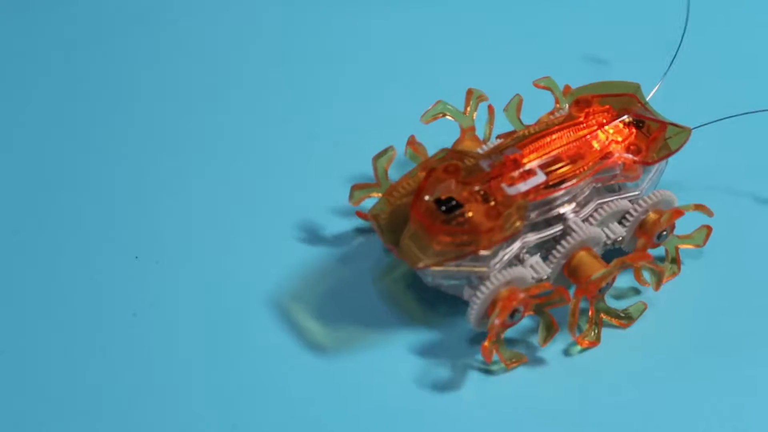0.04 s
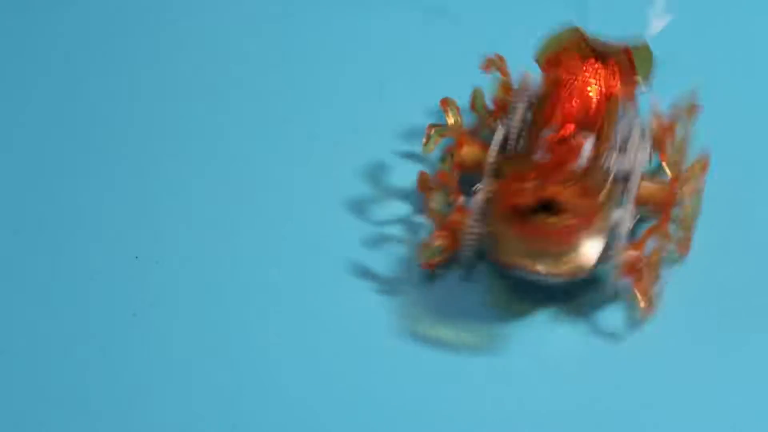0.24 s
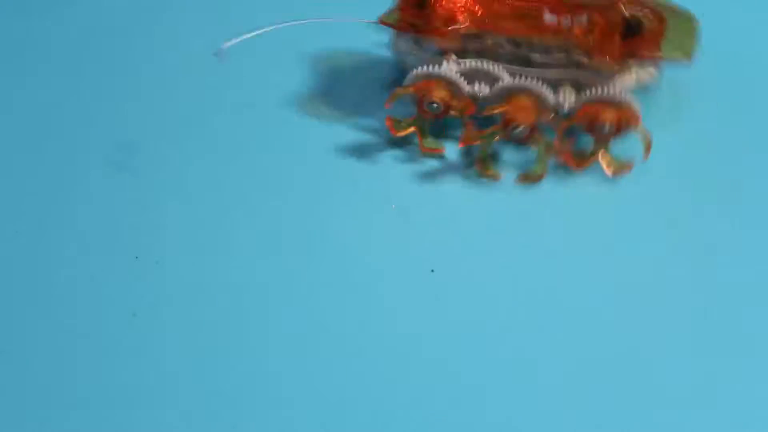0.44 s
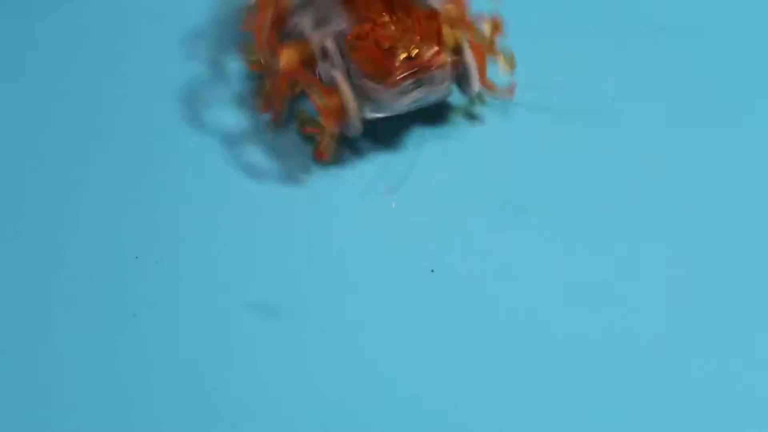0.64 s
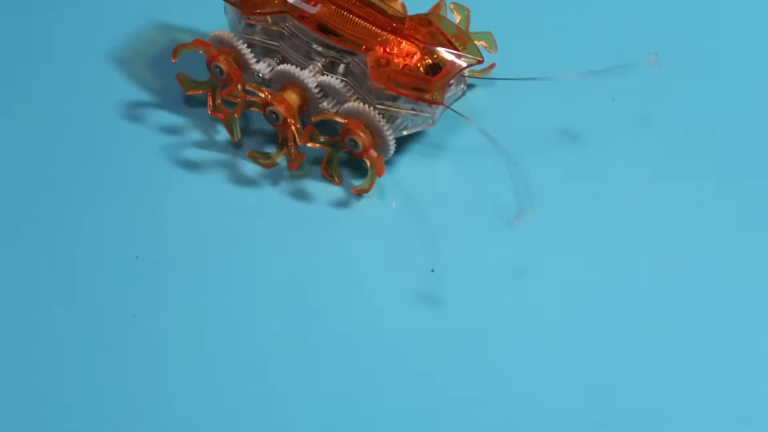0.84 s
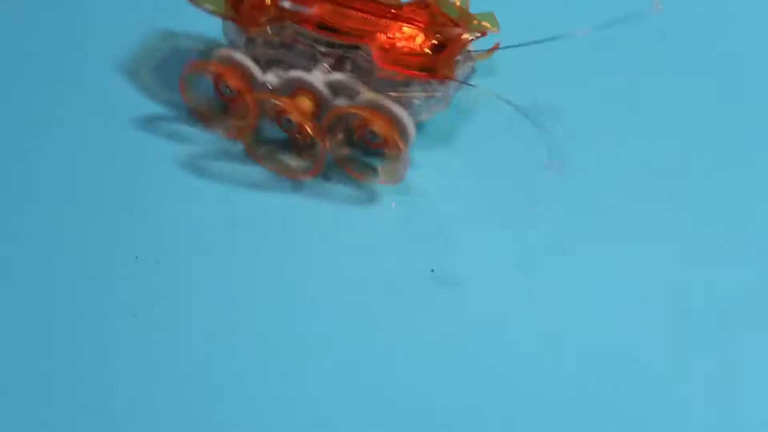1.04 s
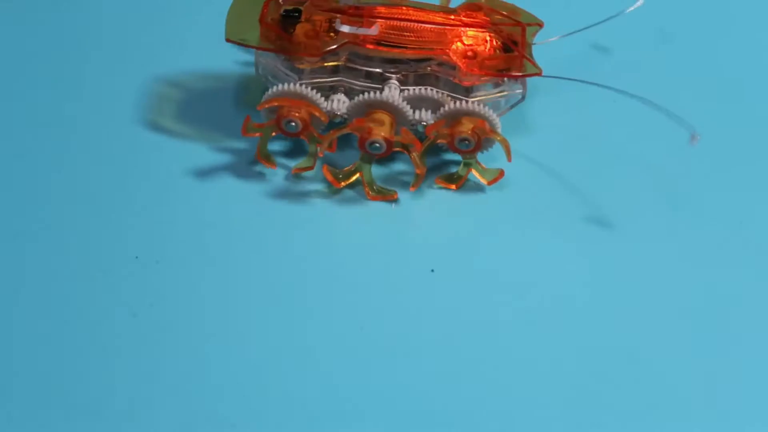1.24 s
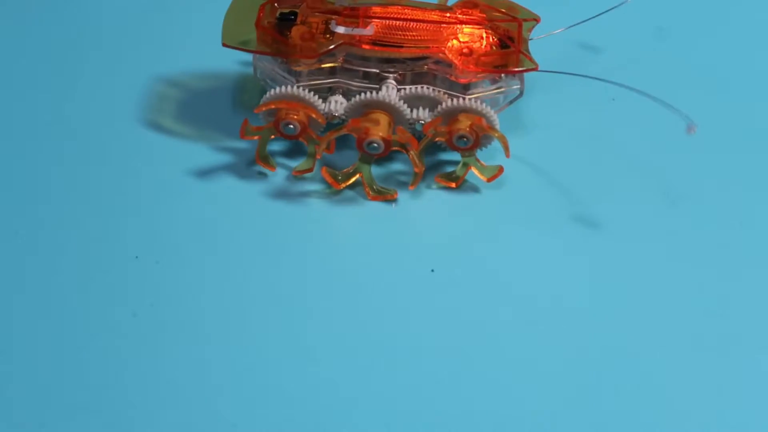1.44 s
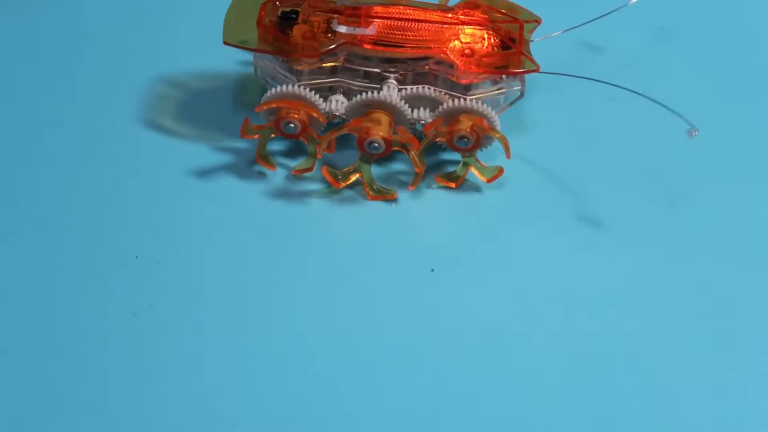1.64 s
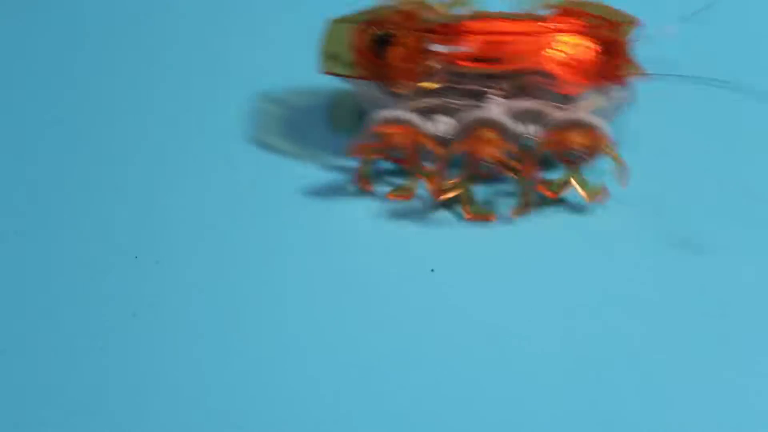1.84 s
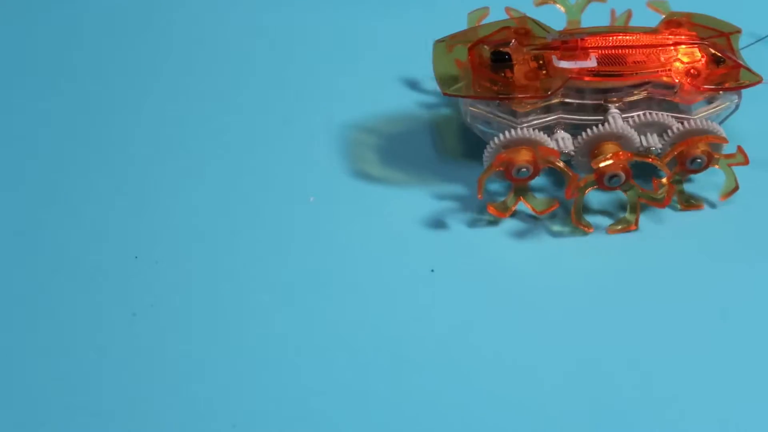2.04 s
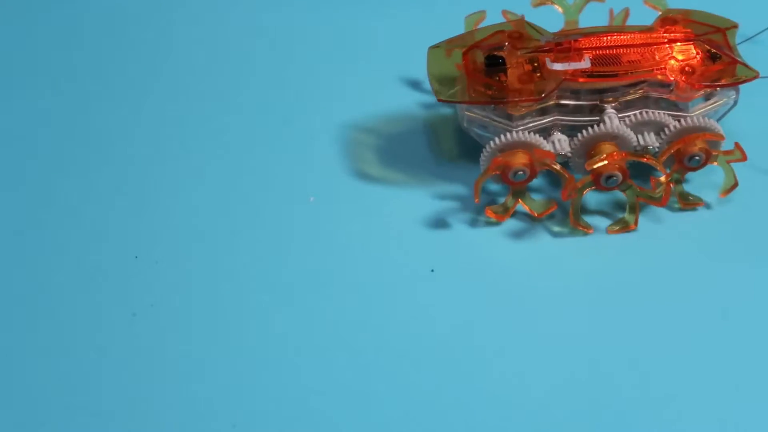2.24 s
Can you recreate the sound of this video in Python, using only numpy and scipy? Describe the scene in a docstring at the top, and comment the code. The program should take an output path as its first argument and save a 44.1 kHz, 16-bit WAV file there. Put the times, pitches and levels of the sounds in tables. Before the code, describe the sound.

A small toy robot scuttles across a table in three short, rattling bursts.

```python
"""A small plastic toy robot scuttles over a hollow table top in three short bursts.
Each foot slap thumps the table's modes and shakes the loose shell; the gears rattle while the
motor runs, and the legs tick as they come to rest. Before each burst a button on a hand-held
remote snaps and rings its case. A quiet room echoes both and hums behind them."""
import sys
import numpy as np
from scipy import signal
from scipy.fft import rfft, irfft
from scipy.io import wavfile

SR = 44100
rng = np.random.default_rng(int(sys.argv[2]) if len(sys.argv) > 2 else 0)


def master(y):
    """Save y as 16-bit WAV."""
    cut = np.clip(np.atleast_2d(y).T, -1, 1)
    pcm = np.round(cut * 32767)  # scale
    wavfile.write(sys.argv[1], SR, pcm.astype(np.int16))


N = 101429


def amp(db):
    """Decibels to gain."""
    return 10 ** (np.asarray(db) / 20)


def at_hz(points, hz):
    """Read a table on a log-frequency axis."""
    points_hz, values = np.transpose(points)
    return np.interp(np.log(hz), np.log(points_hz), values)


def impulses(start_s, gain):
    """Impulses at the given times and gains."""
    out = np.zeros(N + SR)
    np.add.at(out, (np.asarray(start_s) * SR).astype(int), gain)
    return out[:N]


def lag(x, tau_s):
    """One-pole smoothing."""
    r = np.exp(-1 / (tau_s * SR))
    return signal.lfilter([1 - r], [1, -r], x + 1e-18)


def ring(x, hz, t60_s):
    """One mode: a unit impulse starts a decaying sine of height 1."""
    r, w = amp(-60 / (t60_s * SR)), 2 * np.pi * hz / SR
    return signal.lfilter([0, np.sin(w)], [1, -2 * r * np.cos(w), r * r], x + 1e-18)


def flicker(tau_s, rms_db):
    """Randomly wandering gain."""
    drift = lag(lag(rng.standard_normal(N), tau_s), tau_s)
    return amp(rms_db * drift / np.sqrt(np.mean(drift ** 2) + 1e-20))


def stereo(mid, side):
    """Mid and side to left and right."""
    return np.array([mid + side, mid - side])


# Motor effort. Each row: time in seconds, gear rattle in dB, shuffle on the table in dB.
MOTOR_EFFORT = [(0, -53.5, -43), (.06, -62.5, -46), (0.184, -60, -47), (0.188, -30.5, -23.5),
                (.22, -29.5, -21), (.4, -28.5, -21.5), (.58, -30.5, -23), (.67, -28, -22.5),
                (0.769, -30, -26), (.82, -44, -36.5), (.93, -62.5, -44), (1.086, -65.5, -60),
                (1.091, -28, -31), (1.15, -23.5, -24.5), (1.2, -30.5, -26), (1.279, -41, -27.5),
                (1.34, -56.5, -45), (1.42, -64.5, -61), (1.757, -66, -54), (1.76, -30, -29.5),
                (1.819, -24.5, -21), (1.92, -26.5, -27), (1.96, -36.5, -20.5), (2.018, -35.5, -25),
                (2.08, -48.5, -39), (2.129, -58, -36.5), (2.18, -66, -58), (2.3, -67, -62)]


def motor():
    """The motor drives gears and shuffling feet: one gain curve for each."""
    time_s, gear_db, shuffle_db = np.transpose(MOTOR_EFFORT)
    return [amp(np.interp(np.arange(N) / SR, time_s, db)) for db in (gear_db, shuffle_db)]


# Foot slaps. Each row: start in seconds, shell rattle in dB, table thump in dB, table knock in dB.
FOOTFALLS = [(0.001, -46.5, -38, -31.5), (0.1971, -50, -46, -38), (0.216, -30.5, -51, -34.5),
             (0.2225, -25.5, -14, -17.5), (0.242, -24.5, -34, -34), (0.256, -24, -11.5, -13.5),
             (0.2668, -31, -27, -25), (0.2797, -24, -6, -35), (0.2931, -25, -14, -26.5),
             (0.303, -17.5, -16, -37), (0.311, -29, -22, -38), (0.3254, -43, -10.5, -44),
             (0.341, -39, -17, -29), (0.3468, -16.5, -4.5, -13.5), (0.365, -20, -24, -12.5),
             (0.3838, -20, -26, -17), (0.4062, -21, -26, -33), (0.419, -23, -10.5, -34),
             (0.431, -28, -43, -37), (0.441, -15.5, -17, -17.5), (0.452, -36, -46, -14.5),
             (0.4655, -20, -5.5, -49.5), (0.504, -17, -10, -7.5), (0.5153, -18, -33, -15.5),
             (0.5369, -16.5, -7.5, -8.5), (0.5648, -21.5, -29, -20), (0.5871, -18.5, -8.5, -17),
             (0.5969, -31, -45, -13), (0.6115, -38, -19, -36), (0.6204, -20, -16, -23),
             (0.6337, -23.5, -25, -13.5), (0.6623, -32, -33, -26), (0.6705, -19.5, -20, -33),
             (0.6789, -19.5, -14, -12.5), (0.6961, -27, -45, -25), (0.7048, -19, -30, -13),
             (0.716, -28, -24, -8.5), (0.734, -22, -13, -15.5), (0.7612, -23.5, -33, -20),
             (0.77, -25.5, -44, -13), (0.7942, -31.5, -32, -21), (0.849, -69, -62, -36),
             (0.8781, -61, -59, -41), (0.905, -71, -33, -38), (1.0912, -43, -49, -30),
             (1.1029, -44, -15.5, -50), (1.1152, -44, -39.5, -33), (1.131, -22.5, -19, -21),
             (1.1591, -17, -23, -43), (1.17, -23.5, -24, -37), (1.1842, -19.5, -11.5, -32),
             (1.2057, -26, -36, -25), (1.2204, -25, -41, -16), (1.2417, -24.5, -44.5, -21),
             (1.251, -55, -17.5, -19.5), (1.2635, -36, -31, -33), (1.2753, -31.5, -43, -31),
             (1.3003, -59, -40, -59), (1.3265, -48, -36, -51), (1.3442, -62, -31, -35),
             (1.373, -58, -39, -48), (1.769, -41, -49, -36), (1.7882, -15, -7, -17.5),
             (1.8132, -16, -26.5, -18.5), (1.8318, -29, -24, -41), (1.843, -44, -34, -34),
             (1.853, -39, -13, -52), (1.8608, -19, -15.5, -46), (1.8826, -18.5, -10, -26),
             (1.9085, -18.5, -17, -25), (1.9278, -16.5, -10, -15.5), (1.9465, -25, -10, -50),
             (1.963, -25, -13.5, -34), (1.9843, -30.5, -9.5, -26), (1.989, -50, -49.5, -37),
             (2.0002, -30, -46, -22), (2.0106, -30.5, -42, -30), (2.044, -42, -41, -24.5),
             (2.0552, -36, -51, -34), (2.1047, -56, -24.5, -36), (2.113, -56, -35, -48)]
# Table top, low and upper modes. Each row: frequency in Hz, level in dB, T60 in seconds.
THUMP_MODES = [(110.7, -3.5, 0.15), (139.2, -7, 0.061), (168, -14, 0.13), (213.4, -14.5, 0.089)]
KNOCK_MODES = [(286, -29, 0.01), (356, -9, 0.07), (416, -17, 0.13), (457, -7.5, 0.075), (548, -17, 0.067),
               (650, -16, 0.061), (796, -8, 0.03), (939, -15.5, 0.051), (1089, -11.5, 0.05),
               (1234, -8.5, 0.023), (1815, -12, 0.018)]
THUMP_DELAY_S, THUMP_SCATTER_DB = 0.00332, 2
KNOCK_DELAY_S, KNOCK_SCATTER_DB, KNOCK_SHUFFLE_DB = 0.00145, 4.5, 1
SHUFFLES_PER_S, CONTACT_S, TABLE_HIGHPASS_HZ = 300, 0.00034, 101


def table_top(shuffle_gain):
    """Each foot pushes the top down, striking every mode unevenly; small shuffles fill in between."""
    start_s, _, thump_db, knock_db = np.transpose(FOOTFALLS)
    shuffling = rng.random(N) < SHUFFLES_PER_S / SR
    groups = ((THUMP_MODES, THUMP_DELAY_S, thump_db, THUMP_SCATTER_DB, 0),
              (KNOCK_MODES, KNOCK_DELAY_S, knock_db, KNOCK_SCATTER_DB, KNOCK_SHUFFLE_DB))
    slaps = rumble = steady_rumble = 0
    for modes, delay_s, foot_db, spread_db, shuffle_db in groups:
        scatter_db = spread_db * rng.standard_normal((len(start_s), len(modes)))
        for k, (hz, mode_db, t60_s) in enumerate(modes):
            pushes = impulses(start_s + delay_s, -amp(foot_db + mode_db + scatter_db[:, k]))
            slaps += ring(pushes, hz, t60_s)
            shuffles = amp(mode_db + shuffle_db) * shuffling * rng.standard_normal(N)
            rumble += ring(shuffles * shuffle_gain, hz, t60_s)
            steady_rumble += ring(shuffles, hz, t60_s)
    top = lag(slaps + rumble / np.std(steady_rumble), CONTACT_S)
    return signal.sosfilt(signal.butter(4, TABLE_HIGHPASS_HZ, "high", fs=SR, output="sos"), top)


# Shell spectrum. Each row: frequency in Hz, relative density in dB.
SHELL_SPECTRUM = [(410, -32), (700, -3.5), (777, 8), (875, -16.5), (1250, -3.5), (1360, -12.5),
                  (1970, -2.5), (2190, -12), (3160, -3.5), (3640, -3), (4210, -15.5), (4730, -4.5),
                  (8420, -17.5), (12800, -16.5), (16000, -58)]
# Shell width. Each row: frequency in Hz, side over mid in dB.
SHELL_WIDTH = [(700, -65), (1300, -30), (2500, -80), (5000, -12.5), (9000, -11), (15000, -2.5)]
# Gear colour against the shaken parts. Each row: frequency in Hz, gain in dB.
GEAR_COLOUR = [(800, -12.5), (2000, -0.5), (3400, 1), (6000, 0.5), (9000, -0.5), (15000, -4)]
# Gear rasp brightening and dulling. Each row: time in seconds, gain above RASP_HZ in dB.
GEAR_RASP = [(.2, -0.5), (.5, 3), (.62, 0), (.68, 5), (.75, -1), (1.1, -1.5), (1.3, -2), (1.78, 0),
             (1.86, 2), (1.93, 3.5), (2.0, -7), (2.3, 2)]
RASP_HZ, RATTLE_RISE_S, RATTLE_FALL_S = 4300, 0.0013, 0.003
TICKS_PER_S, TICK_SPREAD_DB, TICK_GROUPS, SHELL_T60_CYCLES = 18000, 2.0, 9, 27.6


def shell(gear_gain):
    """Dense ticks of gears and loose parts ring short plastic modes; each footfall shakes out a burst."""
    start_s, rattle_db = np.transpose(FOOTFALLS)[:2]
    shake = lag(lag(impulses(start_s, amp(rattle_db)), RATTLE_RISE_S), RATTLE_FALL_S)
    shake *= amp(rattle_db.max()) / shake.max()
    gears = gear_gain * flicker(tau_s=0.0013, rms_db=1.5)
    rasp = amp(np.interp(np.arange(N) / SR, *np.transpose(GEAR_RASP)))
    ticking = rng.random(N) < TICKS_PER_S / SR
    strength = amp(TICK_SPREAD_DB * rng.exponential(1, N))
    ticks = ticking * strength * rng.choice([-1, 1], (2, N))
    group = rng.integers(0, TICK_GROUPS, N)   # each tick rings only its group of modes
    out = power = 0
    for k, hz in enumerate(np.geomspace(750, 15000, 36)):
        t60_s, density = SHELL_T60_CYCLES / hz, amp(at_hz(SHELL_SPECTRUM, hz))
        mode_ticks = ticks * (group == k % TICK_GROUPS) * flicker(tau_s=0.0087, rms_db=3)
        gain = density * np.sqrt(hz) / np.std(ring(mode_ticks[0], hz, t60_s))
        gear_drive = gears * amp(at_hz(GEAR_COLOUR, hz)) * (rasp if hz > RASP_HZ else 1)
        mid, side = gain * ring(mode_ticks * np.hypot(shake, gear_drive), hz, t60_s)
        out += stereo(mid, side * amp(at_hz(SHELL_WIDTH, hz)))
        power += density ** 2 * hz
    return out / np.sqrt(power)


# Hum spectrum. Each row: frequency in Hz, relative density in dB.
HUM_SPECTRUM = [(15, -46), (25, -0.5), (141, -8), (200, -5.5), (373, -7.5), (405, -20.5), (463, -14),
                (1190, -20.5), (1520, -20.5), (12500, -55.5), (15000, -88)]
# Hum width. Each row: frequency in Hz, side over mid in dB.
HUM_WIDTH = [(30, -52), (60, -32), (110, -20), (200, -17.5), (380, -5.5), (700, -4.5), (1290, -4.5),
             (2380, -3.5), (4400, 8.5), (8120, 8.5), (15000, 11)]
HUM_DB = -48.5


def hum():
    """Steady low room noise, wider in the treble."""
    hz = np.maximum(np.fft.rfftfreq(N, 1 / SR), 1)
    mid_db = at_hz(HUM_SPECTRUM, hz)
    side_db = mid_db + at_hz(HUM_WIDTH, hz)
    mid, side = irfft(rfft(rng.standard_normal((2, N))) * amp([mid_db, side_db]), N)
    return amp(HUM_DB) * stereo(mid, side) / np.std(mid)


# Room decay. Each row: frequency in Hz, T60 in seconds.
ROOM_T60 = [(200, 0.42), (2200, 0.49), (6000, 0.41), (14000, 0.15)]
# Reverb width. Each row: frequency in Hz, side over mid in dB.
ROOM_WIDTH = [(280, -53), (560, -51), (1100, -12.5), (2300, -6), (4500, -3), (9000, 5), (16000, -37)]
EARLY_S, EARLY_DB, ROOM_LOWPASS_HZ = 0.0071, -1, 23000


def room(x):
    """Diffuse echoes: a noise tail that starts slightly softer and dies faster in the treble."""
    t = np.arange(int(.6 * SR)) / SR
    edges_hz = 200 * 2. ** np.arange(8)
    white = rng.standard_normal((2, len(t)))
    onset = np.where(t > EARLY_S, 1, amp(EARLY_DB))
    tail = 0
    for low, high in zip(edges_hz, np.minimum(edges_hz[1:], .45 * SR)):
        centre_hz = np.sqrt(low * high)
        band = signal.sosfilt(signal.butter(2, [low, high], "band", fs=SR, output="sos"), white)
        band[1] *= amp(at_hz(ROOM_WIDTH, centre_hz))
        tail += band * amp(-60 * t / at_hz(ROOM_T60, centre_hz)) * onset
    tail /= np.sqrt(np.sum(tail[0] ** 2))
    softened = lag(x, 1 / (2 * np.pi * ROOM_LOWPASS_HZ))
    return stereo(*signal.fftconvolve(softened[None], tail, axes=1)[:, :N])


# Button clicks. Each row: start in seconds, level in dB, body offset in dB.
CLICKS = [(0.1595, -7.5, -15), (0.9517, -7, -12), (1.7060, -6.5, 1)]
# Remote case and its hollow body. Each row: frequency in Hz, level in dB, T60 in seconds.
CASE_MODES = [(2200, -11, .009), (2750, -20, .004), (3100, -16, .004), (3480, -10, .005), (4350, -12, .004),
              (4950, -10, .0035), (6500, -10, .003), (8050, -21, .004), (8800, -20, .004),
              (10100, -21, .004), (11300, -25, .003)]
BODY_MODES = [(1100, -15, .003), (1550, -8, .004), (2230, -4, .004)]
# First wall echoes. Each row: delay in seconds, level in dB.
WALL_ECHOES = [(.0125, -20), (.0175, -18.5), (.021, -18)]
CHATTER_DB, CHATTER_S, CASE_HIGHPASS_HZ = -15, 0.0007, 720


def remote():
    """A snap and a brief chatter of the button ring the case; the nearest walls echo it."""
    start_s, click_db, body_db = np.transpose(CLICKS)
    case = 0
    for modes, level_db in ((CASE_MODES, click_db), (BODY_MODES, click_db + body_db)):
        snap = impulses(start_s, -amp(level_db))
        chatter = amp(CHATTER_DB) * lag(lag(snap, CHATTER_S), CHATTER_S) * CHATTER_S * SR
        for k, (hz, mode_db, t60_s) in enumerate(modes):
            force = chatter * rng.standard_normal(N) + snap * (-1) ** k
            case += ring(amp(mode_db) * force, hz, t60_s)
    case = signal.sosfilt(signal.butter(3, CASE_HIGHPASS_HZ, "high", fs=SR, output="sos"), case)
    dulled = lag(case, tau_s=.00003)
    return case + sum(amp(db) * np.roll(dulled, int(delay_s * SR)) for delay_s, db in WALL_ECHOES)


# Leg ticks. Each row: start in seconds, level in dB.
LEG_TICKS = [(0.877, -41.5), (1.342, -39.5), (1.349, -46), (2.187, -47.5)]
# Leg modes. Each row: frequency in Hz, level in dB, T60 in seconds.
LEG_MODES = [(1128, 3, 0.031), (1450, -5.5, 0.032), (1730, -5, .04)]


def legs():
    """The plastic legs tick softly as they come to rest."""
    start_s, tick_db = np.transpose(LEG_TICKS)
    return sum(ring(impulses(start_s, amp(tick_db + db)), hz, t60_s) for hz, db, t60_s in LEG_MODES)


ROBOT_ROOM_DB, REMOTE_ROOM_DB, REMOTE_HALF_LAG_S = -16, -13, .000015


def scene():
    """Robot on the table, remote off to one side, both in the room."""
    gear_gain, shuffle_gain = motor()
    robot = table_top(shuffle_gain) + shell(gear_gain) + legs()
    button = remote()
    clicks = stereo(button, np.gradient(button) * REMOTE_HALF_LAG_S * SR)   # left leads right
    room_send = amp(ROBOT_ROOM_DB) * robot.mean(axis=0) + amp(REMOTE_ROOM_DB) * button
    return robot + clicks + room(room_send) + hum()


CEILING, STOPBAND_HZ = 0.97, 16300


def record(dry):
    """Soft clip, then a steep low-pass."""
    rounded = CEILING * np.tanh(dry / CEILING)
    return signal.sosfilt(signal.cheby2(12, 70, STOPBAND_HZ, fs=SR, output="sos"), rounded)


dry = scene()
out = record(dry)
master(out)
```